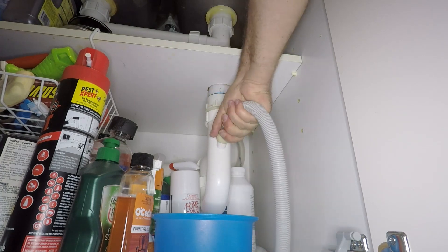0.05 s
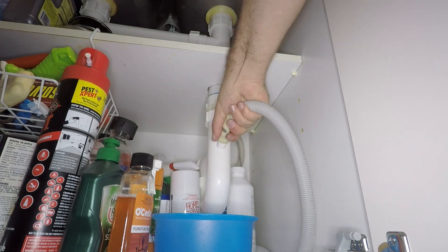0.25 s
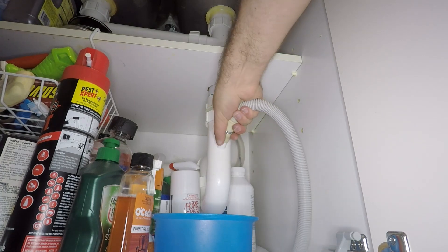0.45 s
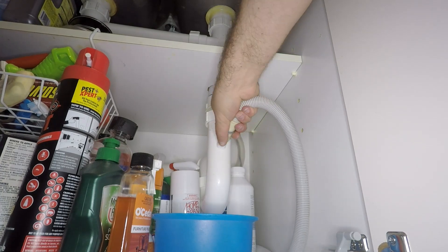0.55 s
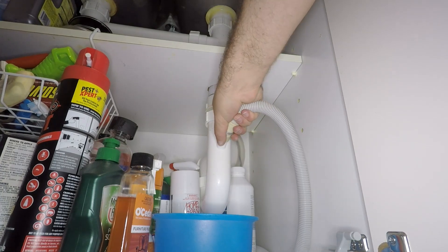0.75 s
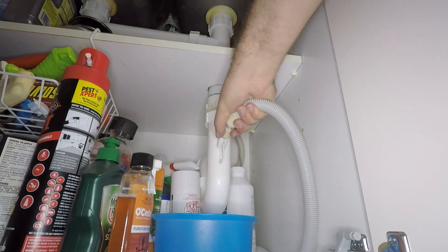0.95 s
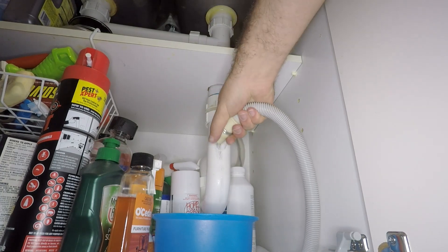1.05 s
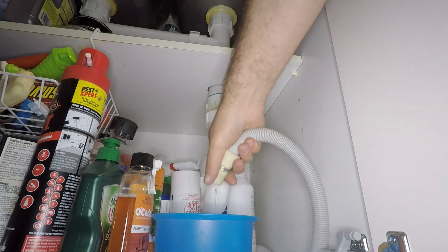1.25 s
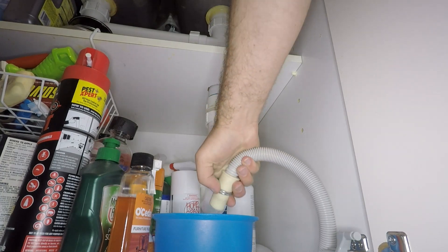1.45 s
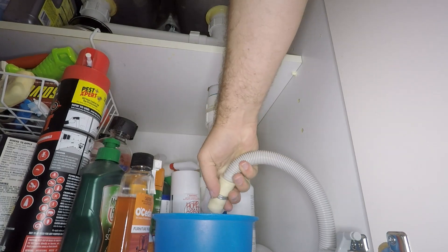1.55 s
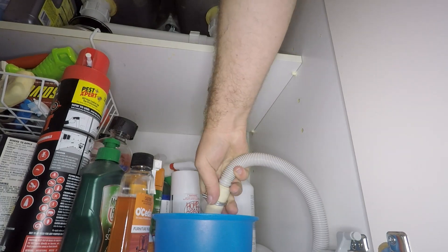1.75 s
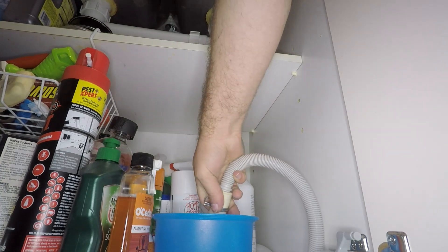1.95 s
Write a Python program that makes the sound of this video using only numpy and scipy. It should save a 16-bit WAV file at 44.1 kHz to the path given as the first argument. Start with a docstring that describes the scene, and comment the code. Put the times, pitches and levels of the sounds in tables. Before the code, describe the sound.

Corrugated plastic hose pulled off a pipe with a sharp snap, hollow thump and faint ticking.

```python
"""Inside a kitchen cabinet, a corrugated plastic drain hose is worked off the spigot of a sink trap.
The cuff snaps and slips, scrapes off by stick-slip friction and knocks the pipe with a hollow thump;
the impacts excite the damped modes of pipe, cabinet and air column. Then the ribs tick and rustle as
the hose is lowered. The cabinet adds close reflections, the kitchen a faint tail, rumble and hum."""
import sys
import numpy as np
from scipy import signal
from scipy.fft import rfft, irfft
from scipy.io import wavfile
from scipy.ndimage import uniform_filter1d

SR = 44100
rng = np.random.default_rng(int(sys.argv[2]) if len(sys.argv) > 2 else 0)


def dump(signal):
    """Clip the signal to [-1, 1] and save it as 16-bit WAV at the path in sys.argv[1]."""
    limited = np.clip(np.atleast_2d(signal).T, -1, 1)
    pcm = np.round(limited * 32767).astype(np.int16)
    wavfile.write(sys.argv[1], SR, pcm)


N = 88200

# Table levels are relative; t60 is the time of a 60 dB decay.
# snaps of the cuff on the pipe: t/s, pipe level/dB, crack level/dB, boom level/dB, rim level/dB
CUFF_SNAPS = [(0.2209, 1, 1, -18, -10), (0.2671, -15.5, -17.5, -21.5, -26), (.331, -26.5, -34, -33, -24.5),
              (.3432, -29.5, -31, -50, -19), (.3455, -17, -17.5, -22.5, -40), (.9824, -10, -16, -22.5, -8)]
# dull knocks: t/s, pipe level/dB, boom level/dB, air column level/dB
DULL_KNOCKS = [(.228, -23, -18, 2.5), (.609, -35, -31, -20), (.820, -41.5, -49, -51.5),
               (.890, -15.5, -1.5, -10)]
# ticks of the hose ribs: t/s, click level/dB, hollow tock level/dB, rib resonance f/Hz
RIB_TICKS = [(.458, -38.5, -67, 8150), (1.107, -34.5, -33.5, 8020), (1.124, -36, -37, 6700),
             (1.147, -36, -51, 10600), (1.168, -30, -45, 9300), (1.185, -35.5, -38.5, 3330),
             (1.220, -36, -35.5, 6760), (1.266, -42, -62.5, 4300), (1.318, -35, -54.5, 3840),
             (1.333, -39.5, -50, 3840), (1.638, -40.5, -27.5, 2710), (1.649, -44.5, -45, 4160),
             (1.675, -66, -31.5, 4100), (1.688, -51, -36.5, 3900), (1.699, -46.5, -33.5, 3900),
             (1.741, -42, -37.5, 1950), (1.785, -46.5, -67.5, 4900), (1.811, -32, -38, 9500),
             (1.901, -39, -32.5, 4080), (1.932, -29.5, -63, 4720), (1.958, -37.5, -36, 2630),
             (1.976, -35.5, -38.5, 3150), (1.983, -34.5, -41, 2560)]
# modes of the pipe and hose: f/Hz, level/dB, t60/s
PIPE_MODES = [(357, -15.5, .11), (437.3, -4, 0.088), (494.3, -10.5, 0.15), (634.7, 1.5, 0.04),
              (702.5, -2.5, 0.078), (792, -8, 0.081), (910, -16.5, .08), (1046, -19.5, 0.23),
              (1143.5, -27.5, 0.067), (3012, -36, 0.047), (7200, -27.5, .035)]
# modes of the cabinet: f/Hz, level/dB, t60/s
CABINET_MODES = [(63.4, -12.5, 0.61), (82, -9.5, .14), (101.7, 3, 0.1), (112.8, -19.5, .55), (258, -14, .1),
                 (337, -12, 0.074), (472, -0.5, 0.052)]
# spectrum of the cuff's crack: f/Hz, level/dB
CRACK_SPECTRUM = [(200, -8), (900, 10.5), (1800, -10.5), (2700, 5.5), (3800, 3), (5000, -8.5), (6000, -4.5),
                  (7600, 3.5), (9300, -6.5), (12500, -9.5), (16000, -25.5)]
# spectrum of the ringing cuff rim: f/Hz, level/dB
RIM_SPECTRUM = [(1000, -31.5), (1650, -19), (2050, 2), (2350, -7.5), (2720, 4.5), (3000, -10), (3500, 0),
                (4100, -9.5), (5000, -18), (9000, -34.5)]
# spectrum of a rib's click: f/Hz, level/dB
CLICK_SPECTRUM = [(300, -24), (1500, -2.5), (2300, -2.5), (4000, 1), (5400, -4.5), (7200, -2), (9000, -4.5),
                  (11500, -7), (13500, -17), (16000, -31.5)]
# spectrum of the hollow pipe and hose: f/Hz, level/dB
HOLLOW_SPECTRUM = [(100, -19), (400, -12.5), (560, -7), (750, 1), (1000, -1.5), (1330, -8.5), (1650, -29),
                   (3000, -35), (8000, -63)]
# spectrum of the scraping cuff: f/Hz, level/dB
SCRAPE_SPECTRUM = [(40, -37), (100, 3.5), (200, -3), (450, 0.5), (750, -4), (1200, -12.5), (2200, -30.5),
                   (2850, -22.5), (3300, -32.5), (3800, -23.5), (5000, -33), (7500, -33), (12000, -39),
                   (16000, -61)]
# spectrum of the room rumble: f/Hz, level/dB
ROOM_SPECTRUM = [(25, -9), (58, 9), (90, -2.5), (150, -6.5), (300, -17), (520, -16), (730, -10.5),
                 (1000, -30), (1600, -38), (4000, -43), (7500, -34), (11000, -44), (16000, -51.5)]
# envelope of the cuff sliding off: t/s, level/dB
SLIDE_ENVELOPE = [(.85, -62), (.868, -41), (.882, -32), (.895, -21), (.91, -35.5), (.93, -33), (.96, -43.5),
                  (.985, -50), (1.05, -58)]
# envelope of the hose rustling in the hand: t/s, level/dB
RUSTLE_ENVELOPE = [(0, -61.5), (.09, -76), (.2, -68.5), (.45, -69), (.6, -88), (.74, -91), (.82, -66.5),
                   (1.1, -70), (1.2, -61.5), (1.3, -66.5), (1.34, -58.5), (1.42, -72), (1.5, -88),
                   (1.6, -67.5), (1.67, -65.5), (1.86, -66.5), (1.93, -60.5), (2, -57.5)]
# reflections from the cabinet walls: delay/s, gain/1
WALL_ECHOES = [(.0013, 0.17), (.0046, 0.37), (.0093, .25)]
# spectrum of the reverberation: f/Hz, level/dB
TAIL_SPECTRUM = [(200, 6), (600, -1), (3000, 0), (8000, -4), (16000, -1.5)]

PIPE_DB, SHELL_DB, CRACK_DB, BOOM_DB = -10, 9, 1, -9
SNAP_PUSH_S, KNOCK_PUSH_S, BOOM_PUSH_S = .00008, .00093, .0014
AIR_HZ, AIR_DB, AIR_T60_S = 179.5, -26, .26
CLICK_DB, TOCK_DB, RIB_DB, RIB_Q = 4.5, 10, .5, 5.9
CABINET_TAIL_DB, KITCHEN_TAIL_DB = -6.5, -18.5
ROOM_DB, HUM_DB, HUM_HZ = -57, -68.5, 733


def cuff_impacts():
    """Impulse response: blows ring pipe and cabinet; snaps also crack and ring the rim, knocks the air."""
    snap_s, snap_pipe_db, crack_db, snap_boom_db, rim_db = np.array(CUFF_SNAPS).T
    knock_s, knock_pipe_db, knock_boom_db, air_db = np.array(DULL_KNOCKS).T
    pipe_force = blows(snap_s, snap_pipe_db, SNAP_PUSH_S) + blows(knock_s, knock_pipe_db, KNOCK_PUSH_S)
    shell = colour(burst(t60=.017), HOLLOW_SPECTRUM)
    pipe = convolve(pipe_force, undb(PIPE_DB) * ring(PIPE_MODES) + undb(SHELL_DB) * shell)
    crack_response = colour(burst(t60=.03) + burst(t60=.0046), CRACK_SPECTRUM)
    crack = convolve(blows(snap_s, crack_db), crack_response)
    rim = convolve(blows(snap_s, rim_db), colour(burst(t60=.04), RIM_SPECTRUM))
    air_column = convolve(blows(knock_s, air_db), ring([(AIR_HZ, AIR_DB, AIR_T60_S)]))
    boom_force = blows(snap_s, snap_boom_db, BOOM_PUSH_S) + blows(knock_s, knock_boom_db, BOOM_PUSH_S)
    boom = convolve(boom_force, ring(CABINET_MODES))
    return pipe + undb(CRACK_DB) * crack + undb(BOOM_DB) * boom + rim + air_column


def cuff_scrape():
    """Stick-slip friction: the cuff scrapes along the spigot until it comes free."""
    t = np.arange(N) / SR
    sliding = (t > SLIDE_ENVELOPE[0][0]) & (t < SLIDE_ENVELOPE[-1][0])
    return colour(grains(SLIDE_ENVELOPE, per_s=2500, scatter_db=3) * sliding, SCRAPE_SPECTRUM)


def hose_ribs():
    """Resonance: each rib clicks at its own pitch and sounds the hollow hose, amid finer crackle."""
    ticks = np.zeros(N)
    for start_s, click_db, tock_db, hz in RIB_TICKS:
        flick = burst(t60=.022) * (1 - decay(t60=.015))
        rib = signal.lfilter(*signal.iirpeak(hz, RIB_Q, SR), flick)
        click = undb(CLICK_DB) * colour(flick, CLICK_SPECTRUM) + undb(RIB_DB) * rib / np.linalg.norm(rib)
        tock = colour(burst(t60=.047), HOLLOW_SPECTRUM)
        ticks += delay(undb(click_db) * click + undb(TOCK_DB + tock_db) * tock, start_s)
    crackle = grains(RUSTLE_ENVELOPE, per_s=1200, scatter_db=1)
    rustle = undb(-6.5) * colour(crackle, CLICK_SPECTRUM) + undb(-.5) * colour(crackle, HOLLOW_SPECTRUM)
    hand_damping = signal.butter(3, 13500, "low", fs=SR, output="sos")
    return signal.sosfilt(hand_damping, ticks + rustle)


def reverberate(direct):
    """Reflection: wall echoes, then diffuse tails of cabinet and kitchen with their bass filtered out."""
    early = sum(gain * delay(direct, delay_s) for delay_s, gain in WALL_ECHOES)
    tail = undb(CABINET_TAIL_DB) * burst(t60=.11) + undb(KITCHEN_TAIL_DB) * burst(t60=.5)
    tail *= 1 - decay(t60=.023)  # the diffuse field builds up
    tail = signal.sosfilt(signal.butter(2, 200, "high", fs=SR, output="sos"), tail)
    return direct + early + convolve(direct, colour(tail, TAIL_SPECTRUM))


def kitchen_background():
    """Stationary noise gives the room rumble; slight frequency modulation makes a faint hum waver."""
    drift = unit_rms(uniform_filter1d(rng.standard_normal(N), SR // 20))
    hum = np.sin(2 * np.pi * np.cumsum(HUM_HZ * (1 + .0062 * drift)) / SR)
    rumble = colour(rng.standard_normal(N), ROOM_SPECTRUM)
    return undb(ROOM_DB) * unit_rms(rumble) + undb(HUM_DB) * unit_rms(hum)


def blows(times, db, push_s=0):
    """Contact force pulses: the longer the push, the duller the spectrum."""
    impulses = np.zeros(N)
    np.add.at(impulses, (times * SR).astype(int), undb(db))
    pole = np.exp(-2 * np.pi / (push_s * SR + 1e-9))
    return signal.sosfilt([[1 - pole, 0, 0, 1, -pole, 0]] * 2, impulses + 1e-18)


def grains(envelope, per_s, scatter_db):
    """Stick-slip as a Poisson process: clicks of random size under a level envelope."""
    slips = rng.random(N) < per_s / SR
    clicks = slips * rng.standard_normal(N) * undb(scatter_db * rng.random(N))
    times, db = np.array(envelope).T
    return unit_rms(clicks) * undb(np.interp(np.arange(N) / SR, times, db))


def ring(modes):
    """Modal superposition: damped sines, neighbours in opposite sign."""
    t = np.arange(N) / SR
    return sum((-1) ** k * undb(db) * decay(t60) * np.sin(2 * np.pi * hz * t)
               for k, (hz, db, t60) in enumerate(modes))


def burst(t60):
    """Modal overlap: dense ringing as decaying noise of unit energy."""
    noise = rng.standard_normal(N) * decay(t60)
    return noise / np.linalg.norm(noise)


def decay(t60):
    """Exponential damping by 60 dB in t60 seconds."""
    return np.exp(-np.log(1000) * np.arange(N) / SR / t60)


def colour(x, spectrum, size=4096):
    """Minimum-phase filtering to the shape of a spectrum, at unit power gain."""
    hz, db = np.array(spectrum, float).T
    bin_hz = np.maximum(np.fft.rfftfreq(size, 1 / SR), 1)
    magnitude = undb(np.interp(np.log(bin_hz), np.log(hz), db))
    cepstrum = irfft(np.log(magnitude))
    cepstrum[1:size // 2] *= 2  # folding onto positive time makes the filter causal
    cepstrum[size // 2 + 1:] = 0
    response = irfft(np.exp(rfft(cepstrum)))
    return convolve(x, response / np.linalg.norm(response))


def convolve(x, response):
    """Linear response to x, cut to N samples."""
    return signal.fftconvolve(x, response)[:N]


def delay(x, seconds):
    """Time shift, cut to N samples."""
    return np.pad(x, (int(seconds * SR), 0))[:N]


def undb(db):
    """Amplitude ratio of a level in decibels."""
    return 10 ** (np.asarray(db) / 20)


def unit_rms(x):
    """Normalisation to unit mean power."""
    return x / np.sqrt(np.mean(x ** 2))


def scene():
    """Superposition: hose and pipe in the cabinet, over the quiet kitchen, in one channel."""
    direct = cuff_impacts() + cuff_scrape() + hose_ribs()
    return (reverberate(direct) + kitchen_background())[None]


def record(dry):
    """Band limiting: filters remove the deep bass and the highest treble."""
    low_cut = signal.butter(3, 41, "high", fs=SR, output="sos")
    high_cut = signal.ellip(8, .2, 80, 16000, fs=SR, output="sos")
    return signal.sosfilt(high_cut, signal.sosfilt(low_cut, dry))


dry = scene()
out = record(dry)
dump(out)
```